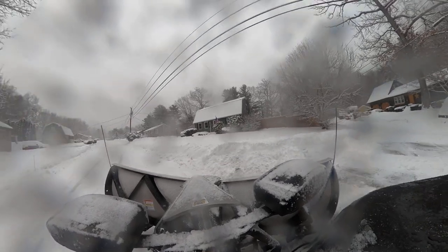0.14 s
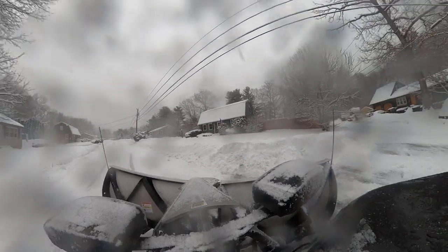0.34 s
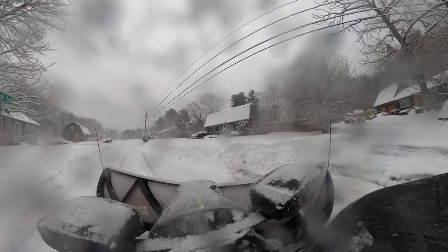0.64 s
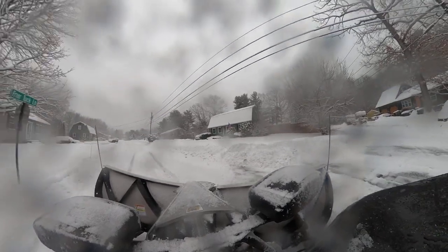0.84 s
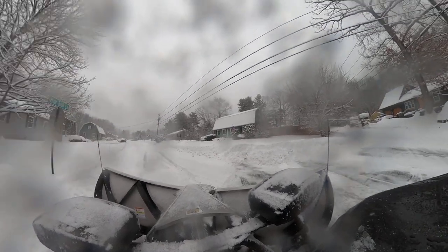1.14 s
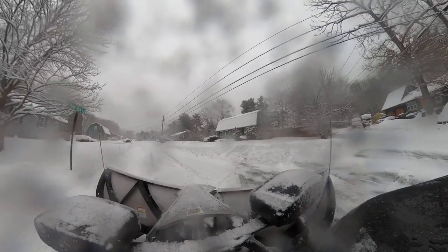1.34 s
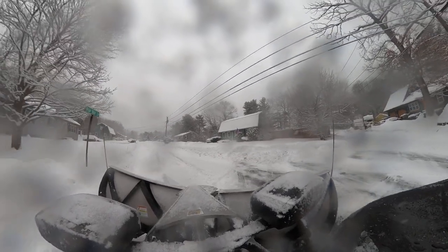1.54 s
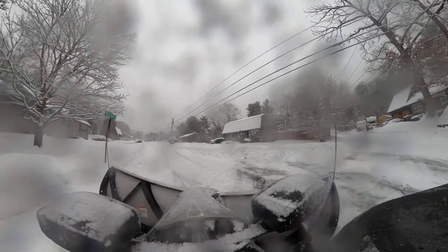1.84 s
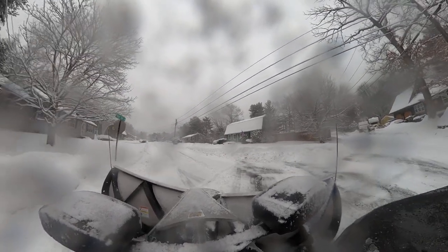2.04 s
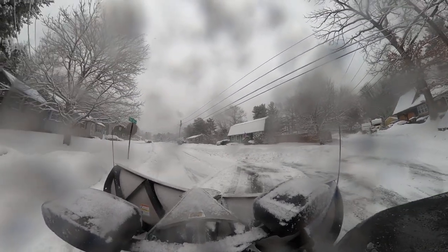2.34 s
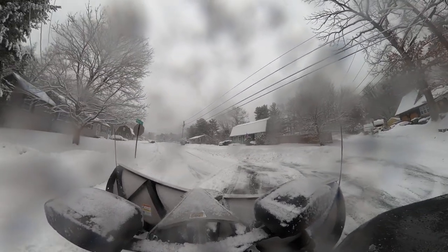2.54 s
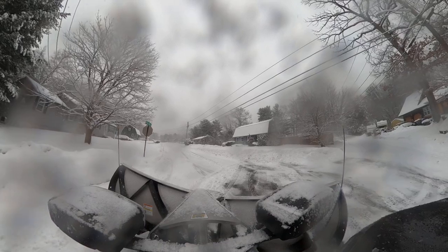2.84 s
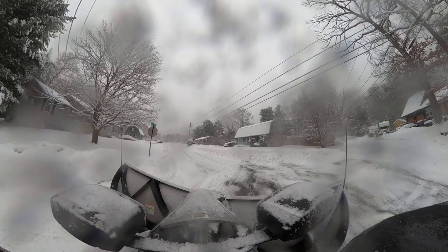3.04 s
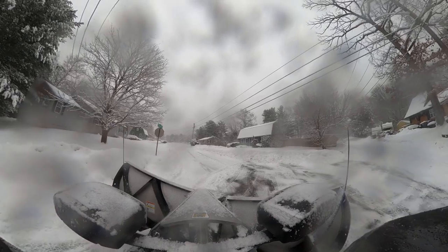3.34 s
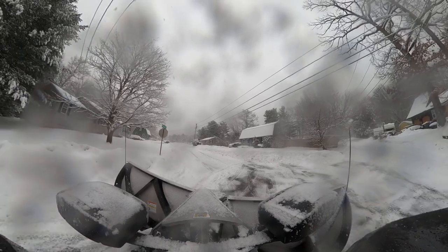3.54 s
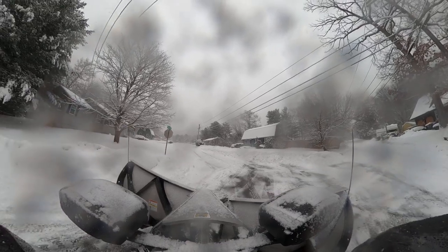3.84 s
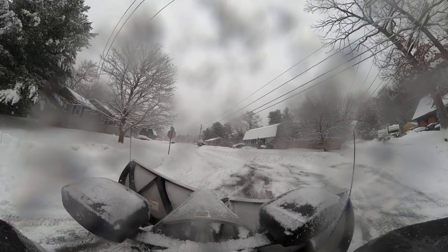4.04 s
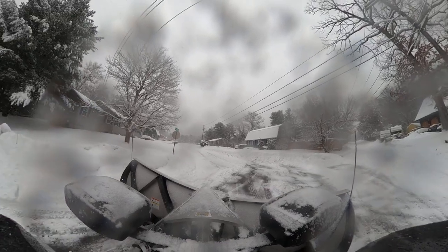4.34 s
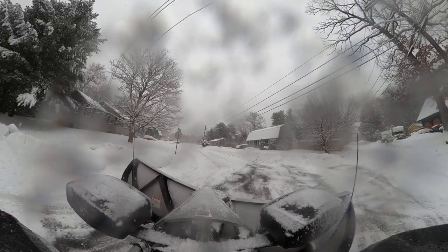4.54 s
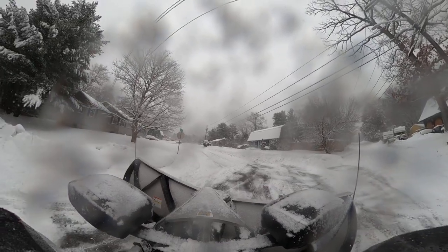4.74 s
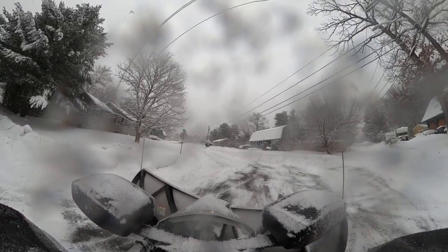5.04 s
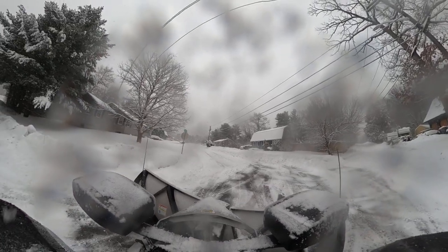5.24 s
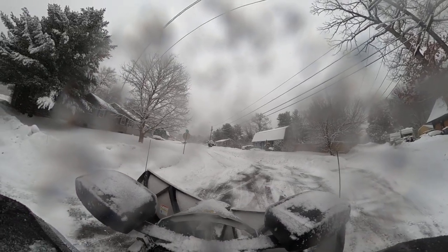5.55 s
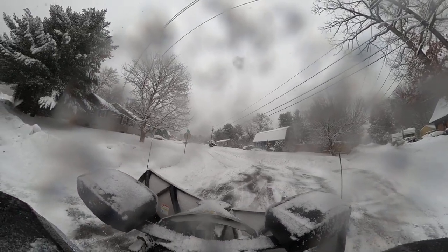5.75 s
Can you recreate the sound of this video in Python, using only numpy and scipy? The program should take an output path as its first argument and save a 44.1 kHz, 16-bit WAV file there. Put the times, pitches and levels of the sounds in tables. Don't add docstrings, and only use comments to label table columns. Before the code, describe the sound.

Muffled truck engine and crunching snow settle into a rattling idle before a valve clunks, a plow blade slams down, scrapes, and the engine revs.

```python
import sys
import numpy as np
from scipy import signal
from scipy.fft import rfft, irfft, next_fast_len
from scipy.io import wavfile
from scipy.ndimage import uniform_filter1d, map_coordinates

SR = 44100
rng = np.random.default_rng(int(sys.argv[2]) if len(sys.argv) > 2 else 0)


def gain_from_db(level_db):
    decades = np.asarray(level_db, float) / 20
    return 10 ** decades


def int16_out(signal):
    q = np.round(np.clip(np.atleast_2d(signal).T, -1, 1) * 32767)
    wavfile.write(sys.argv[1], SR, q.astype(np.int16))


N = 260190
TIME = np.arange(N) / SR


def unit(x):
    return x / np.sqrt(np.mean(x ** 2) + 1e-20)


def along(points, hz):
    f, v = np.transpose(points)
    return np.interp(np.log(hz + 1), np.log(f + 1), v)


def curve(rows):
    s, value = np.transpose(rows)
    return np.interp(TIME, s, value)


def swing(rows):
    db = curve(rows)
    return db - db.mean()


def wobble(rate):
    knots = rng.standard_normal(int(N * rate / SR) + 4)
    return map_coordinates(knots, [np.arange(N) * rate / SR])


def bell(s, width):
    return np.exp(-((TIME - s) / width) ** 2)


def lasting(s, length):
    t = TIME - s
    is_open = 1. * ((t > 0) & (t < length))
    return np.clip(t, 0, length), uniform_filter1d(is_open, size=160)


def filtered(x, response):
    m = next_fast_len(N + SR // 2)
    return irfft(rfft(x, m) * response(np.fft.rfftfreq(m, 1 / SR)), m)[:N]


def resonance(f, hz, width):
    return 1j * f * width / (hz ** 2 - f * f + 1j * f * width)


def rush(spectrum, patchy_db, lo_hz=0, hi_hz=SR):
    z = signal.stft(rng.standard_normal(N), nperseg=512)[2]
    field = uniform_filter1d(rng.standard_normal(z.shape), size=6, axis=0)
    field = uniform_filter1d(field, size=10, axis=1)
    noise = signal.istft(z * gain_from_db(patchy_db * unit(field)), nperseg=512)[1][:N]

    def colour(hz):
        band = 1 / np.sqrt((1 + (lo_hz / (hz + 1)) ** 8) * (1 + (hz / hi_hz) ** 8))
        return gain_from_db(along(spectrum, hz)) * band
    return unit(filtered(noise, colour))


def dying(s, t60, attack):
    t = np.maximum(TIME - s, 0)
    return gain_from_db(np.maximum(-60 * t / abs(t60), -200)) * (1 - np.exp(-t / attack))


def ringing(modes, s, attack):
    out = np.zeros(N)
    for hz, db, t60 in modes:
        luck, phase = rng.standard_normal(2)
        out += gain_from_db(db + 1.4 * luck) * dying(s, t60, attack) * np.sin(2 * np.pi * hz * (TIME - s) + phase)
    return out


IDLE_HZ = 32.8
# (time [s], firing rate [1/s])
FIRING = [(0, 50), (.7, 48), (1.3, 40), (2.1, 35.8), (2.5, 34.2), (2.8, 31.9), (3.3, 31.6), (3.7, 32),
          (4.3, 32.2), (4.7, 33.6), (5, 30), (5.2, 34), (5.5, 48), (5.65, 49.5), (5.78, 53), (5.9, 56)]
CYLINDERS = [0, -2, -1, -3, -1, -2]


def firings():
    rate = curve(FIRING)
    turns = np.cumsum(rate) / SR
    turns = turns - turns[round(3.163 * SR)]
    fired = np.flatnonzero(np.diff(np.floor(turns)))
    cylinder = np.floor(turns[fired + 1]).astype(int) % len(CYLINDERS)
    puffs = np.zeros(N)
    puffs[fired] = gain_from_db(np.array(CYLINDERS)[cylinder] + 1.5 * rng.standard_normal(len(fired)))
    return rate, turns, puffs


# (frequency [Hz], width [Hz], level [dB])
PIPE = [(62.4, 12, -5.5), (97, 52, -10), (158.8, 23.5, -1.5), (173.6, 17, -3.5)]
# (multiple of the firing rate, level over the drone [dB])
ORDERS = [(2, -8), (3, -9), (5, -4), (5.5, 0), (18.6, -13)]
# (time [s], level [dB])
EFFORT = [(0.0, -33.5), (0.06, -34), (0.36, -39), (0.62, -40.5), (2.45, -40), (3.4, -42), (4.22, -41.5),
          (4.57, -40.5), (5.08, -36.5), (5.29, -42.5), (5.49, -43), (5.73, -37.5), (5.9, -35)]


def exhaust_drone(rate, turns, puffs):
    def pipe(f):
        modes = [(-1) ** k * gain_from_db(db) * resonance(f, hz, width) for k, (hz, width, db) in enumerate(PIPE)]
        return sum(modes) ** 2
    drone = 0.6 * unit(filtered(puffs, pipe))
    drone += 0.55 * unit(filtered(rng.standard_normal(N), pipe))
    for k, db in ORDERS:
        loss_db = 0.15 * np.abs(k * rate - 165.6) * (4 < k < 7)
        level_db = db - loss_db + 2.0 * wobble(5.6)
        drone += gain_from_db(level_db) * np.sin(k * 2 * np.pi * turns + wobble(3.7))
    drone_db = -33 - 1.28 * np.abs(rate - IDLE_HZ) + 0.81 * swing(EFFORT)
    return gain_from_db(drone_db - 0.5) * drone


# (frequency [Hz], level per Hz [dB])
BLOCK = [(450, -120), (750, -1.7), (950, -2.5), (1160, -5.5), (1300, -4), (1750, -4.5), (2100, -8.5),
         (2700, -15.5), (3400, -20.5), (4700, -24), (5400, -31.5), (7000, -38), (9000, -49.5),
         (17000, -120)]
# (frequency [Hz], width [Hz], level [dB])
COVER = (1161, 76, 2.7)


def block_clatter(rate, puffs):
    idle_knock = 0.27
    share = np.clip(idle_knock - 0.018 * (rate - IDLE_HZ), 0, 1)
    swell = np.arange(SR // 20) / SR / 0.0044
    knocks = unit(signal.fftconvolve(puffs, swell * np.exp(-swell))[:N])
    cover_hz, width, cover_db = COVER

    def cover(f):
        return gain_from_db(cover_db) * resonance(f, cover_hz, width)
    clatter = unit(filtered(rush(BLOCK, patchy_db=1.0), lambda f: 1 + cover(f)))
    clatter = clatter * (1 - share + share * knocks)
    uneven = puffs * gain_from_db(2.2 * rng.standard_normal(N))
    clatter += gain_from_db(-12.5) * share / idle_knock * unit(filtered(uneven, lambda f: cover(f) ** 2))
    return gain_from_db(-39.5 + swing(EFFORT)) * clatter


# (time [s], peak level [dB], half width [s], level of second multiple [dB])
SURGES = [
    (.05, -32, 0.09, 9.5),
    (.164, -21.5, 0.057, -7),
    (.33, -32.5, .03, 6),
    (.504, -25, 0.059, -5),
    (5.68, -27, 0.057, -17),
    (5.93, -21, 0.19, -18),
]


def load_tone(turns):
    phase = 2 * np.pi * turns + 0.25 * wobble(12)
    out = np.zeros(N)
    for s, db, width, second_db in SURGES:
        out += gain_from_db(db) * bell(s, width) * (np.sin(phase) + gain_from_db(second_db) * np.sin(2 * phase))
    return np.sqrt(2) * out


# (time [s], level [dB])
SHAKE = [(0.0, -19.5), (0.26, -30), (0.72, -35.5), (2.22, -40.5), (3.27, -34), (3.57, -37.5), (3.99, -37),
         (4.34, -31.5), (4.5, -28.5), (5.19, -30), (5.47, -28.5), (5.67, -33.5), (5.83, -26.5),
         (5.9, -29.5)]
# (time [s], extra level [dB], half width [s])
BUMPS = [
    (.18, 2.5, .04),
    (.33, 3, .025),
    (3.35, 5, 0.043),
    (4.06, 2, .04),
    (4.42, 2, .04),
    (4.49, 4, 0.022),
    (5.8, 5.5, 0.019),
]
# (frequency [Hz], level per Hz [dB])
RUMBLE = [(11, -26.5), (18, -10), (97, -1.5), (128, 1.5), (167, -1.5), (183, 0.5), (200, -8.5), (260, -40),
          (440, -120)]
# (frequency [Hz], level per Hz [dB])
CRUNCH = [(100, -16.5), (170, -5.5), (205, -11), (271, -8), (382, -14), (501, -11), (555, -16),
          (604, -13.5), (780, -22.5), (842, -20.5), (957, -26), (1150, -18), (1300, -28.5), (1690, -49),
          (2860, -120)]
# (frequency [Hz], level per Hz [dB])
SPRAY = [(1200, -120), (2000, -2.5), (3000, -8), (4000, -21.5), (4900, -17), (6000, -21.5), (7200, -27.5),
         (8500, -37), (10500, -44), (12500, -55), (14500, -66), (17000, -120)]


def road():
    effort_db, shake_db = swing(EFFORT), swing(SHAKE)
    for s, db, width in BUMPS:
        shake_db = shake_db + db * bell(s, width)
    rolling = np.clip(1 - TIME / 3.64, 0, 1)
    sway = wobble(3.3)
    rumble_db = -30 + shake_db + 0.6 * sway + wobble(9)
    crunch_db = -31 + 0.52 * effort_db + 0.27 * shake_db + 2.5 * rolling
    crunch_db = crunch_db + 0.2 * sway + 0.6 * wobble(13)
    spray_db = -58 + 2.07 * effort_db + 1.1 * wobble(27)
    out = gain_from_db(rumble_db) * rush(RUMBLE, patchy_db=1, hi_hz=130)
    out += gain_from_db(crunch_db) * rush(CRUNCH, patchy_db=0.5, hi_hz=920)
    return out + gain_from_db(spray_db) * rush(SPRAY, patchy_db=1.9, lo_hz=3010)


# (time [s], peak level [dB], fall by 60 dB [s])
PINS = [(0.5, -56, .012), (4.6548, -45, 0.016), (4.7074, -57, 0.015), (5.21, -39, 0.014),
        (5.2304, -32, 0.015), (5.249, -35, 0.015), (5.2679, -31, 0.015), (5.3044, -46, 0.015),
        (5.3275, -33, 0.018), (5.368, -38.5, 0.019), (5.3864, -51, 0.015), (5.4054, -44, 0.015),
        (5.4484, -56, 0.015), (5.5109, -51, 0.015)]
# (frequency [Hz], level per Hz [dB])
PIN_COLOUR = [(1500, -57), (3500, 1.5), (6000, 9.5), (8500, -6), (11000, -15), (14500, -35), (17000, -120)]


def pin_rattle():
    hiss = rush(PIN_COLOUR, patchy_db=1.0)
    return sum(gain_from_db(db - 2.0) * hiss * dying(s, 1.4 * t60, attack=0.0011) for s, db, t60 in PINS)


# (time [s], peak level [dB], frequency [Hz])
INJECTOR = [(1.918, -39, 1440), (2.0847, -36, 1430), (2.7826, -34, 1380), (2.9751, -36, 1390),
            (3.1612, -35, 1400), (3.3493, -41, 1420), (3.5414, -36, 1420), (3.7294, -38, 1470),
            (3.916, -37, 1440), (4.1001, -40, 1450), (4.2921, -36, 1450)]


def injector_ticks():
    out = np.zeros(N)
    for s, db, hz in INJECTOR:
        out += gain_from_db(db) * ringing([(hz, 6, 0.045), (1.21 * hz, -5, 0.03)], s, attack=0.002)
    return out


# (time [s], peak level [dB], brightness
# [dB])
VALVE = [
    (4.862, -7.5, -22),
    (4.873, -11, -18),
    (4.886, -16, -12),
    (4.929, -19, -17),
    (4.963, -19, -16),
    (4.995, -20.5, -16),
    (5.033, -29, -9),
    (5.105, -19, -16),
]
# (frequency [Hz], level [dB], fall by 60 dB [s])
FRAME = [(81.2, 0.5, 0.6), (217.5, 0, 0.49), (242.4, 1, .28)]
# (frequency [Hz], level [dB], fall by 60 dB [s])
RAM = [(709, -5, 0.061), (1035, -3.5, 0.075), (1140, 0, 0.051), (1767, -3, 0.047), (1940, -8, 0.041),
       (2475, -9, 0.04)]
# (frequency [Hz], level per Hz [dB])
BLADE = [(24, -120), (40, 10), (120, 0), (260, -8), (450, -10.5), (800, -14.5), (1300, -20), (2200, -21),
         (3500, -31), (5500, -35), (8000, -45), (11000, -68), (14500, -77), (17000, -120)]


def valve_clunk():
    rasp = rush(BLADE, patchy_db=0.0, lo_hz=720, hi_hz=3500)
    fizz = rush(SPRAY, patchy_db=-2.0, lo_hz=2780)
    out = gain_from_db(-13.5) * ringing(FRAME, VALVE[0][0], attack=0.003)
    for s, db, bright_db in VALVE:
        out += gain_from_db(db - 8) * ringing(RAM, s, attack=0.001)
        out += gain_from_db(db - 9) * rasp * dying(s, 0.025, attack=0.0002)
        out += gain_from_db(db + bright_db - 4) * fizz * dying(s, 0.06, attack=0.0008)
    return out


# (frequency [Hz], level per Hz [dB])
NOZZLE = [(1800, -120), (3000, 7), (3700, -8), (4300, 0), (5100, 1), (6000, -1), (7000, 2.5), (7700, -14),
          (8400, -4), (9100, -18), (10500, -23), (12000, -34), (14500, -46), (17000, -120)]


def oil_hiss():
    start_s, stop_s, opening_s = 4.955, 5.22, 0.023
    t, flowing = lasting(start_s, stop_s - start_s)
    flowing = flowing * np.minimum(t / opening_s, 1)
    return flowing * gain_from_db(-48.5 + 0.6 * wobble(45)) * rush(NOZZLE, patchy_db=-1)


# (time [s], peak level [dB], fall by 60 dB [s], tilt [dB per octave])
BLOWS = [
    (5.1999, 2.5, 0.012, -1),
    (5.2007, -6, 0.067, -6.5),
    (5.2186, -2, 0.047, -7.5),
]
# (frequency [Hz], level [dB], fall by 60 dB [s])
MOLDBOARD = [(47.5, 1.5, 0.84), (121, 2.5, 0.45), (236, 5, .3), (293, 2, 0.22), (400, -19, 0.16)]


def blade_blows():
    dull_hz = 6500
    out = gain_from_db(-16.0) * ringing(MOLDBOARD, BLOWS[0][0], attack=0.017)
    for s, db, t60, tilt_db in BLOWS:
        top_db = 4 * tilt_db
        colour = [(60, -12.0), (300, 5.0), (4800, top_db), (7000, top_db - 22),
                  (9000, top_db - 45), (14000, top_db - 65)]
        blow = gain_from_db(db - 5) * rush(colour, patchy_db=0.5) * dying(s, t60, attack=0.0002)
        out += filtered(blow, lambda f: 1 / (1 + 1j * f / dull_hz) ** 3)
    return out


# (time [s], level [dB], width [s], direction)
JOLTS = [
    (5.2009, -4, .00009, 1),
    (5.2165, -5, .0015, -1),
    (5.22, -6, .0005, 1),
    (5.243, -3, .001, -1),
    (5.266, -3, .0012, -1),
    (5.338, -9, .0015, 1),
]


def mount_jolts():
    out = np.zeros(N)
    for s, db, width, side in JOLTS:
        u = (TIME - s) / width
        out += side * gain_from_db(db) * (1 - 0.6 * u ** 2) * np.exp(-u ** 2 / 2)
    return out


# (start level [dB], sinking [dB per s], bending [dB per s squared])
BOOM = (-20.5, 4.4, 60)
GRIND = (-14.5, 39, 53)
GRIT = (-24.5, 336, 20)
# (start level [dB], sinking [dB per s])
GRIT_FLOOR = (-35.5, 37)


def blade_scrape():
    length_s, lift_s = 0.35, 0.12
    t, touching = lasting(5.203, length_s)
    touching = touching * np.minimum((length_s - t) / lift_s, 1)

    def fading(db, sink, bend=0):
        return touching * gain_from_db(db - sink * t - bend * t ** 2)
    grit = fading(*GRIT) + fading(*GRIT_FLOOR)
    judder = gain_from_db(2.4 * wobble(70))
    out = 0.7 * fading(*BOOM) * rush(BLADE, patchy_db=3, hi_hz=250)
    out += 0.81 * fading(*GRIND) * judder * rush(BLADE, patchy_db=-1, lo_hz=235, hi_hz=1480)
    return out + 1.21 * grit * judder * rush(BLADE, patchy_db=2.5, lo_hz=1120)


def scene():
    rate, turns, puffs = firings()
    engine = exhaust_drone(rate, turns, puffs) + block_clatter(rate, puffs) + load_tone(turns) + injector_ticks()
    hydraulics = valve_clunk() + oil_hiss()
    blade = pin_rattle() + blade_blows() + mount_jolts() + blade_scrape()
    return (engine + road() + hydraulics + blade)[None]


def low_pass(x):
    return signal.sosfilt(signal.butter(12, 14900, fs=SR, output="sos"), x)


def record(dry):
    soft = dry / (1 + np.abs(dry / 0.95) ** 4) ** (1 / 4)
    return low_pass(soft)


dry = scene()
out = record(dry)
int16_out(out)
```